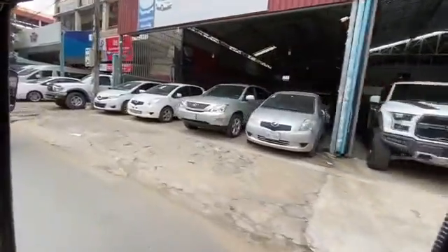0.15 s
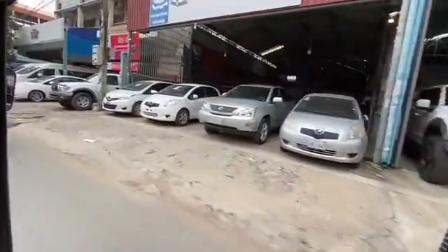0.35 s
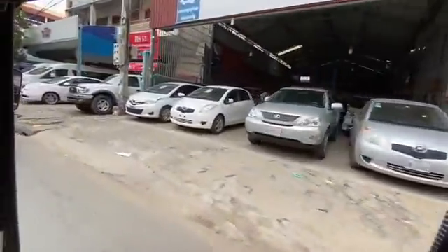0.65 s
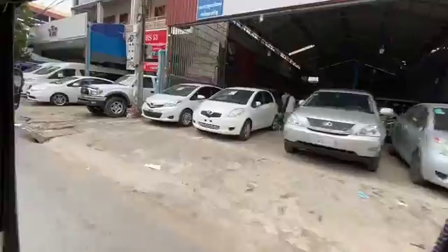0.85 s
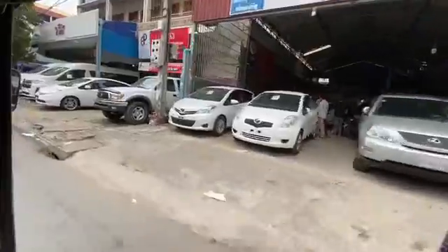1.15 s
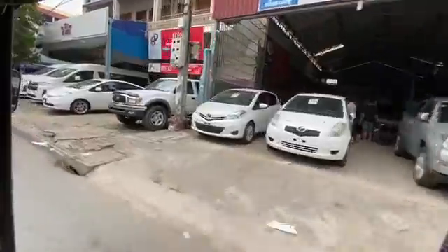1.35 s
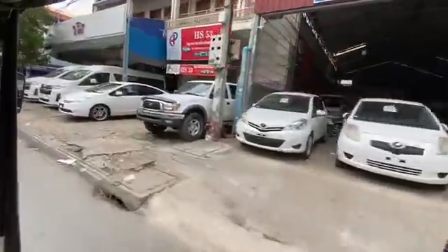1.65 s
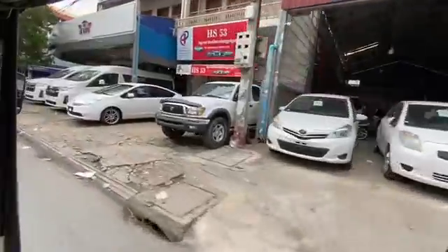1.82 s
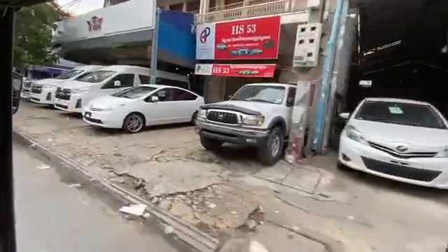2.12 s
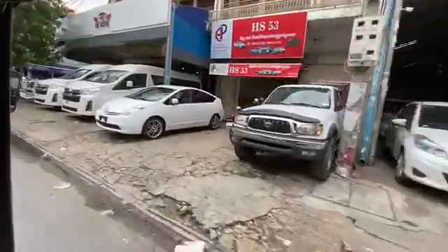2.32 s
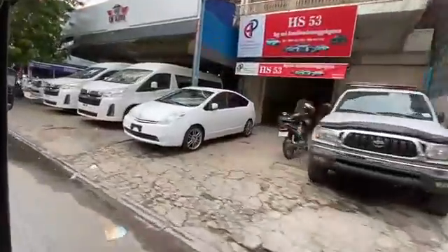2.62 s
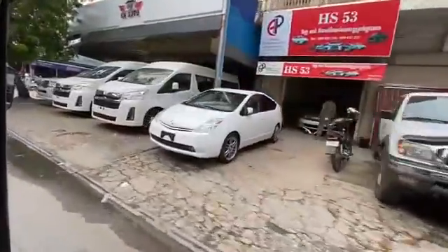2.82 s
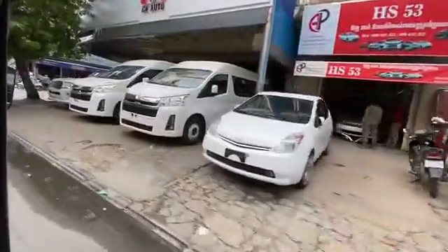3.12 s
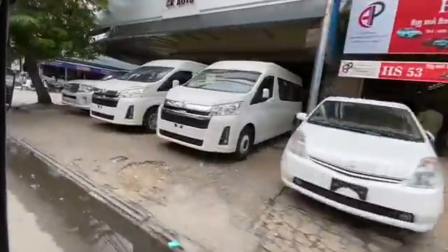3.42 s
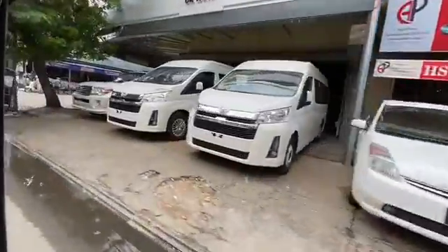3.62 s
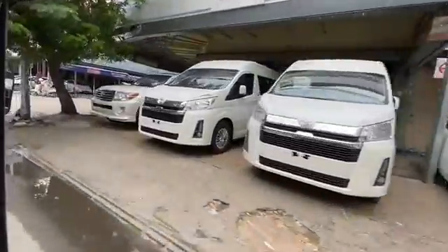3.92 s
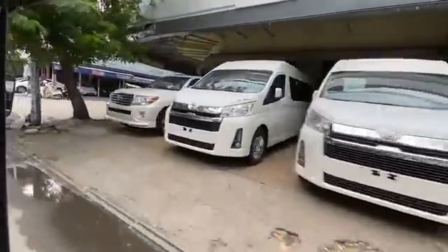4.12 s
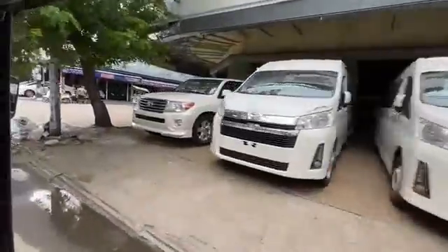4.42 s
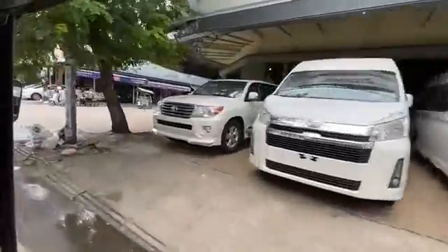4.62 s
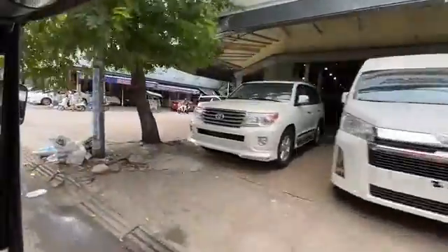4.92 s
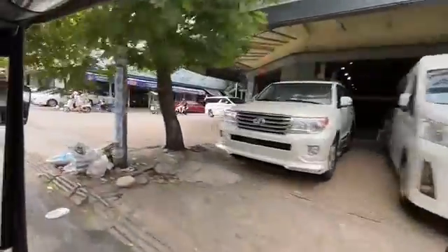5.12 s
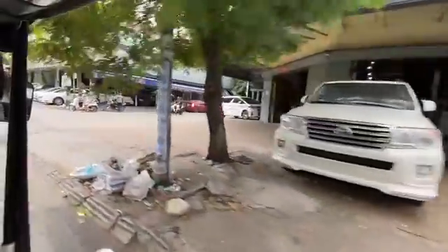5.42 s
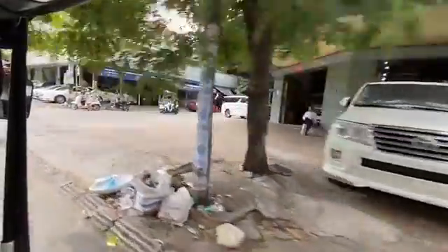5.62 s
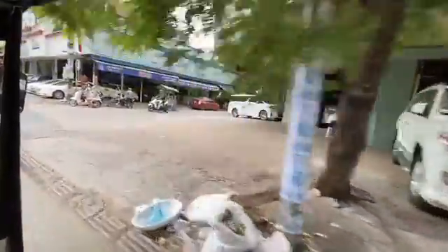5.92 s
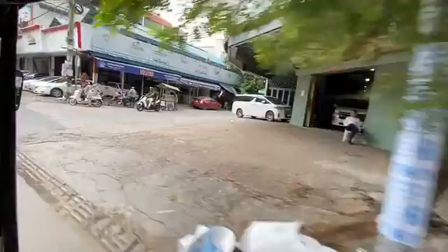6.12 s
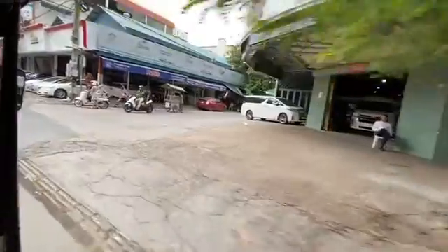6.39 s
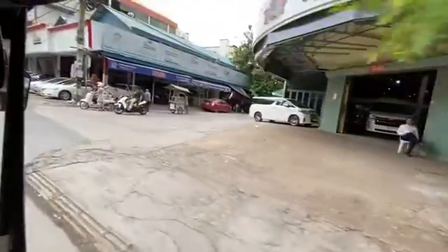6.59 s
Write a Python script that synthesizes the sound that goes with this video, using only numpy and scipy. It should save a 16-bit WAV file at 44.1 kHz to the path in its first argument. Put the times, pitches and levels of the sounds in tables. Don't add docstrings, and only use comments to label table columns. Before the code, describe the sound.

Low engine putter, wind thumps, road hiss and tiny metallic rattles inside an open three-wheeled taxi; revs sag, then briefly recover and fall.

```python
import sys
import numpy as np
from scipy import signal
from scipy.fft import rfft, irfft, next_fast_len
from scipy.io import wavfile
from scipy.ndimage import uniform_filter1d

SR = 44100
rng = np.random.default_rng(int(sys.argv[2]) if len(sys.argv) > 2 else 0)


def convert_level_to_amplitude(level_db):
    exponent = np.asarray(level_db, float) / 20
    return 10 ** exponent


def materialize(psi):
    bounded = np.clip(np.atleast_2d(psi).T, -1, 1)
    quanta = np.round(bounded * 32767).astype(np.int16)
    wavfile.write(sys.argv[1], SR, quanta)


N = 297673
TIME_S = np.arange(N) / SR
PORT_LAG_S = .00046
GEAR_TEETH = 96

# t/s, firing rate f/Hz
FIRING = [(0, 24.7), (.5, 24.62), (1.2, 26.4), (1.5, 26.65), (2.3, 27.1), (3.0, 19.5), (3.25, 18.8),
          (3.5, 18.5), (3.85, 18.7), (4.5, 18.8), (4.75, 19.0), (5.0, 20.5), (5.25, 21.45), (5.5, 21.6),
          (5.8, 21.0), (6.25, 19.2), (6.5, 17.4), (6.75, 16.5)]
# t/s, level/dB
LOAD = [(0, -24), (.7, -24.5), (1.3, -25), (1.6, -29.5), (2.0, -32), (2.3, -40), (2.55, -41.5),
        (2.75, -50.5), (3.0, -44), (3.8, -41), (4.05, -32), (4.75, -29), (5.0, -30), (5.5, -26.5),
        (5.8, -29.5), (6.2, -29), (6.75, -29)]
# t/s, level/dB
WIND = [(0, -16), (.9, -11.5), (1.63, -9.5), (1.74, -17), (1.9, -14.5), (2.06, -12.5), (2.12, -29),
        (2.6, -22), (2.72, -23), (2.84, -17), (3.12, -12), (3.35, -22), (3.78, -18.5), (3.87, -9.5),
        (4.6, -10.5), (5.05, -9), (5.9, -11), (6.1, -8)]


def at_hz(points, hz):
    table_hz, table_db = np.transpose(points)
    return np.interp(np.log(hz), np.log(table_hz), table_db)


def in_time(rows):
    s, *columns = np.transpose(rows)
    return [np.interp(TIME_S, s, column) for column in columns]


def rms_one(x):
    return x / np.sqrt(np.mean(x ** 2) + 1e-20)


def drift(rate_hz):
    r = np.exp(-80 * np.pi * rate_hz / SR)
    slow = signal.lfilter([1], [1, -2 * r, r * r], rng.standard_normal(N // 40 + 2002))
    slow = rms_one(slow[2000:])
    return np.interp(np.arange(N) / 40, np.arange(len(slow)), slow)


def late(x, lag_s):
    return np.roll(x, round(lag_s * SR))


def swell(x, centre, width):
    return np.exp(-(2 * (x - centre) / width) ** 2)


def phase(hz):
    return 2 * np.pi * np.cumsum(hz) / SR


def firing_hz():
    return in_time(FIRING)[0]


def load_db():
    return in_time(LOAD)[0] + 29


def wavering(turn, width_hz, lag_s, steady=0):
    tone = (steady + drift(width_hz)) * np.sin(turn) + drift(width_hz) * np.cos(turn)
    tone = tone / np.sqrt(1 + steady ** 2 / 2)
    return np.array([tone, late(tone, lag_s)])


def turbulence(spectrum, likeness, lag_s, patchy_db, flicker_hz, right_db):
    low_hz, high_hz = spectrum[0][0], spectrum[-1][0]
    centres = low_hz * 2 ** np.arange(0, np.log2(high_hz / low_hz) + .3, 1 / 3)
    size = next_fast_len(N)
    hz = np.fft.rfftfreq(size, 1 / SR)
    shape = convert_level_to_amplitude(at_hz(spectrum, hz + 1)) * (hz > low_hz) * (hz < high_hz)
    white = rfft(rng.standard_normal((3, size))) * shape
    together, out = drift(flicker_hz / 2), 0
    for centre in centres:
        alike = np.clip(at_hz(likeness, centre), 0, 1)
        share = np.cos(np.pi / 2 * np.clip(3 * np.log2((hz + 1) / centre), -1, 1)) ** 2
        common, left, right = irfft(white * share)[:, :N]
        pair = np.sqrt(alike) * np.array([common, late(common, lag_s)])
        pair += np.sqrt(1 - alike) * np.array([left, right])
        patch = 0.33 * together + drift(flicker_hz)
        patch = patch - uniform_filter1d(patch, size=SR // 3)
        balance_db = at_hz(right_db, centre) * np.array([[-.5], [.5]])
        out = out + pair * convert_level_to_amplitude(patchy_db * patch + balance_db)
    return rms_one(out)


def reflections():
    reflectors = [(1.04, 0.38, 2), (1.098, 1, 3.5), (1.904, 0.19, -4), (2.257, 0.097, 2.5),
                  (3.824, 0.97, 4.0), (4.06, 0.21, 2.5), (5.45, 0.93, 2.0)]
    return sum(db * swell(TIME_S, s, length) for s, length, db in reflectors)


def opposite_hiss():
    # f/Hz, level/dB per Hz
    opposite_spectrum = [(11300, -10), (11800, -2), (12900, 3), (13200, -40), (14700, -40), (14900, -4),
                         (15800, -3)]
    hiss = turbulence(opposite_spectrum, [(12000, 1)], 0, patchy_db=-0.5, flicker_hz=15, right_db=[(12000, 0)])[0]
    return convert_level_to_amplitude(-60.5 + reflections()) * hiss * [[1], [-1]]


def alike_above(pair, hz):
    mid, side = (pair[0] + pair[1]) / 2, (pair[0] - pair[1]) / 2
    side = signal.sosfiltfilt(signal.cheby2(8, 30, hz, fs=SR, output="sos"), side)
    return np.array([mid + side, mid - side])


def tyre_hiss():
    # f/Hz, level/dB per Hz
    hiss_spectrum = [(2000, -6), (2900, -6.5), (5500, -5.5), (6500, -9), (7200, -14), (10300, -15.5),
                     (11300, -20), (11700, -26.5), (11800, -90), (12750, -88), (12850, -19), (13300, -20),
                     (14900, -18.5), (15200, -53)]
    puff_db = .7 * np.cos(phase(firing_hz()))
    hiss = turbulence(hiss_spectrum, [(3000, 0.034), (9000, 0.04), (14000, 0.058)], PORT_LAG_S,
                      patchy_db=0.9, flicker_hz=30.5,
                      right_db=[(2500, 9.5), (4500, -5.0), (6500, -5.0), (8000, 0.5), (14000, 4.5)])
    return alike_above(convert_level_to_amplitude(-41.5 + reflections() + puff_db) * hiss, 12800)


def road():
    # f/Hz, level/dB per Hz
    road_spectrum = [(250, -54), (450, -9.5), (650, -11), (900, -7.5), (1300, -9.5), (2000, -15),
                     (2450, -17.5), (2650, -17.5), (2900, -20), (4500, -27.5)]
    roar = turbulence(road_spectrum, [(500, 0.25), (2000, 0.031)], PORT_LAG_S,
                      patchy_db=1.5, flicker_hz=17.5, right_db=[(600, -1.5), (2000, -2.4)])
    return convert_level_to_amplitude(-30 + 0.46 * reflections()) * roar


def flutter():
    # f/Hz, level/dB per Hz
    flutter_spectrum = [(110, 1.5), (170, 5.5), (250, -0.5), (400, -2), (600, -7.5), (1000, -10)]
    builds_s = 0.18
    wind_db = uniform_filter1d(in_time(WIND)[0] + 14.5, size=SR // 4)
    level_db = -22.5 + 0.38 * wind_db + 0.33 * (firing_hz() - 24) + 0.34 * load_db()
    level_db = np.minimum(level_db, late(level_db, builds_s))
    flaps = turbulence(flutter_spectrum, [(170, 0.47), (500, 0.041)], 0,
                       patchy_db=1.7, flicker_hz=13.0, right_db=[(170, 0.2), (500, 0.29)])
    return convert_level_to_amplitude(level_db) * flaps


def buffeting():
    # f/Hz, level/dB per Hz
    buffet_spectrum = [(22, -6), (45, 2.5), (70, 11.5), (100, 9.5), (140, 5.5), (200, -17), (300, -13)]
    lump_db = 0.5 * drift(8.2)
    chug_db = 2.5 * np.cos(phase(firing_hz()))
    air = turbulence(buffet_spectrum, [(40, 0.8), (90, 0.95), (180, 0.77)], 0,
                     patchy_db=1.3, flicker_hz=8.0, right_db=[(40, 0.92), (150, 5.2)])
    return convert_level_to_amplitude(in_time(WIND)[0] + lump_db + chug_db - 7.5) * air


def snaps(table):
    cycles, lift_db, reach_s = 1.25, 3.5, .012
    out, signs = np.zeros(N), rng.choice([-1, 1], len(table))
    for (s, level_db, hz), sign in zip(table, signs):
        span = slice(round((s - reach_s) * SR), round((s + reach_s) * SR))
        t = np.arange(span.start, span.stop) / SR - s
        flick = swell(t, 0, cycles / hz) * np.cos(2 * np.pi * hz * t + 1.0)
        out[span] += sign * convert_level_to_amplitude(level_db + lift_db) * flick
    return out


def gusts():
    # t/s, level/dB, centre f/Hz
    gust_table = [(0.379, -16, 414), (0.527, -20, 383), (0.855, -23, 600), (1.579, -11.5, 325),
                  (1.616, -13, 136), (1.71, -10.5, 212), (1.738, -11, 636), (1.76, -8, 435),
                  (1.782, -18, 637), (1.796, -10, 790), (1.834, -7, 885), (1.852, -10, 550),
                  (1.873, -22.5, 885), (1.923, -15.5, 255), (2.069, -15.5, 314), (2.176, -18.5, 557),
                  (2.223, -15.5, 720), (2.255, -15.5, 607), (2.307, -14, 910), (2.342, -22, 450),
                  (2.365, -35, 700), (2.472, -27, 272), (2.582, -21.5, 690), (2.617, -23, 610),
                  (2.634, -22, 704), (2.666, -20.5, 450), (3.13, -21, 270), (3.146, -15, 600),
                  (3.161, -18, 890), (3.176, -22, 716), (3.188, -9.5, 880), (3.205, -22, 550),
                  (3.219, -21, 362), (3.532, -16.5, 255)]
    # t/s, peak level/dB, f/Hz
    vortex_table = [(.8522, -13, 710), (1.7215, -4, 400), (1.7255, -5, 500), (1.7323, -2, 600),
                    (1.7343, 0, 620), (1.7365, 0, 650), (1.7385, 0, 680), (1.7436, -17, 800),
                    (1.751, -13, 720), (1.7545, -4, 710), (1.7578, -22, 670), (1.7634, -8, 700),
                    (1.767, -15, 710), (1.7725, -7, 885), (1.7758, -8, 680), (1.7795, -7, 850),
                    (1.785, 1, 820), (1.7905, -1, 1310), (1.7943, -9, 1000), (1.7996, -9, 870),
                    (1.8071, -13, 760), (1.8249, -9, 690), (1.8289, -2, 760), (1.8324, -7, 750),
                    (1.8355, -14, 900), (1.839, -6, 1300), (1.8443, -12, 880), (1.8512, -10, 775),
                    (1.8585, -9, 600), (1.8724, -10, 1090), (2.172, -17, 600), (2.22, -24, 900),
                    (2.227, -2.5, 825), (2.2546, -13, 1030), (2.3075, -24, 1010), (2.3124, -3.5, 1020),
                    (2.3157, -8.5, 170), (2.579, -18, 950), (2.5825, -16, 700), (2.586, -17, 450),
                    (2.3315, -16, 800), (2.367, -22, 900), (2.642, -8.5, 1030), (3.147, -14, 1040),
                    (3.152, -17, 920), (3.1567, -10, 1250), (3.1605, -1, 1100), (3.168, -9, 1050),
                    (3.1732, -7, 810), (3.1767, -2, 740), (3.1817, -15, 1020), (3.1858, -9, 950),
                    (3.1894, -6, 980), (3.1933, -3.5, 930), (3.2247, -13, 920)]
    fall = 0.81
    left = np.zeros(N)
    noise = rng.standard_normal(N) * convert_level_to_amplitude(4 * drift(250))
    for s, level_db, hz in gust_table:
        length = 0.038 * (hz / 500) ** -0.88
        span = slice(round((s - 2 * length) * SR), round((s + 2 * length) * SR))
        low_cut = signal.butter(1, hz * .5, "high", fs=SR, output="sos")
        high_cut = signal.butter(3, hz * 1.26, "low", fs=SR, output="sos")
        burst = rms_one(signal.sosfilt(np.vstack([low_cut, high_cut]), noise[span]))
        width = length * np.where(TIME_S[span] > s, fall, 2 - fall)
        left[span] += convert_level_to_amplitude(level_db) * burst * swell(TIME_S[span], s, width)
    left += snaps(vortex_table)
    leak = signal.sosfilt(signal.butter(1, 1200, "low", fs=SR, output="sos"), left)
    return np.array([left, -convert_level_to_amplitude(-10) * leak])


def rattles():
    # t/s, length/s, level/dB
    rattle_table = [(.02, .1, -54), (0.572, 0.08, -46), (1.09, 0.32, -49), (1.42, .12, -52),
                    (1.5, .04, -51), (1.64, 0.06, -47), (1.68, .03, -49), (1.825, .05, -50),
                    (1.91, .02, -49), (1.94, .025, -47), (1.98, .04, -48), (2.13, .04, -52),
                    (2.165, .04, -51), (2.21, .05, -50), (2.27, .05, -52), (2.36, .2, -52), (2.5, .12, -52),
                    (2.61, .04, -50), (2.65, 0.023, -46)]
    ring = signal.butter(2, [5950, 6500], "band", fs=SR, output="sos")
    jingle = rms_one(signal.sosfilt(ring, rng.standard_normal(N) * convert_level_to_amplitude(2.5 * drift(39))))
    return jingle * sum(convert_level_to_amplitude(db) * swell(TIME_S, s, length) for s, length, db in rattle_table)


def ticks():
    # t/s, peak level/dB
    tick_table = [(.2, -43), (.518, -54), (4.515, -52), (5.332, -53), (5.9495, -44)]
    panel_hz = (11750, 13900, 14700)
    brush_s = .006
    brush = sum(convert_level_to_amplitude(db) * swell(TIME_S, s, brush_s) for s, db in tick_table)
    return sum(brush * np.sin(2 * np.pi * hz * TIME_S) * 11750 ** 2 / hz ** 2 for hz in panel_hz)


def squeaks():
    # t/s, length/s, start f/Hz, end f/Hz, level/dB
    squeak_table = [(5.394, .043, 9650, 10350, -42), (6.58, .22, 6500, 6540, -43),
                    (2.122, .022, 6000, 6150, -47), (2.148, .03, 6150, 6400, -45),
                    (2.19, .025, 6250, 6000, -45), (2.235, .025, 5950, 6200, -48),
                    (2.262, .03, 6300, 6420, -46), (2.338, .025, 6150, 6420, -47),
                    (2.375, .025, 6000, 6100, -49), (2.405, .05, 6250, 6400, -49),
                    (2.455, .02, 6150, 6050, -48), (2.492, .016, 6050, 6100, -48),
                    (2.6, .025, 6300, 6150, -47), (2.642, .018, 6100, 6300, -45),
                    (1.625, .035, 6100, 6250, -49), (1.93, .025, 6100, 6150, -49),
                    (1.965, .035, 6200, 6150, -49), (.56, .03, 6100, 6300, -48),
                    (.98, .03, 6200, 6350, -50), (1.16, .03, 6100, 6250, -50), (1.42, .03, 6150, 6300, -50)]
    stick_slip = np.sin(np.pi * 22 * TIME_S) ** 2
    out = np.zeros(N)
    for s, length, start_hz, end_hz, level_db in squeak_table:
        u = np.clip((TIME_S - s) / length, 0, 1)
        turn = phase(start_hz + (end_hz - start_hz) * u)
        grip = 1 - length * 3.8 * (1 - stick_slip)
        out += convert_level_to_amplitude(level_db) * np.sqrt(np.abs(np.sin(np.pi * u))) * grip * np.sin(turn)
    return out * convert_level_to_amplitude([[-1.0], [1.0]])


def small_metal():
    out = rattles() + ticks()
    return np.array([out, late(out, PORT_LAG_S)]) + squeaks()


def frame_knocks():
    # t/s, peak level/dB, f/Hz
    knocks = [(.397, -20, 450), (.521, -19, 450), (1.5805, -14, 402), (1.5835, -17, 377), (6.026, -19, 250)]
    return snaps(knocks)


def panels():
    # t/s, length/s, f/Hz, width f/Hz, level/dB
    rings = [(0.81, 0.28, 2590, 100, -42.5), (1.64, 0.3, 2620, 55, -46), (2.29, 0.27, 2400, 110, -40),
             (3.75, 0.44, 2830, 90, -46), (4.05, 0.36, 2544, 180, -37.5), (4.04, 0.72, 1790, 45, -39),
             (4.795, 0.16, 1760, 25, -40), (4.953, 0.26, 1483, 42, -34.5), (5.4, 0.32, 2700, 27, -43.5),
             (6.087, 0.45, 1840, 57, -42), (3.8, 0.049, 960, 13, -21), (3.857, 0.027, 910, 15, -34),
             (2.6, .16, 2300, 30, -46), (2.85, 0.22, 1950, 25, -44), (6.47, .2, 1880, 13, -40.5),
             (6.65, .25, 2620, 13, -45)]
    # t/s, length/s, f/Hz, width f/Hz, level/dB
    booms = [(4.5, 0.47, 88, 3.8, -24), (4.954, 0.48, 92, 2, -21), (5.52, 0.42, 95, 1.4, -17),
             (6.1, 0.25, 113, 2.7, -27), (6.75, 0.65, 91, 1.5, -32), (6.0, 0.62, 133, 3.6, -22.5),
             (6.5, .55, 112, 1.8, -22), (5.9, 0.44, 280, 5, -31), (5.95, 0.35, 220, 5.3, -32.5),
             (0.1, .3, 76, 3.8, -19.5)]
    out = np.zeros((2, N))
    for s, length, hz, width_hz, db in [*rings, *booms]:
        steady = 2 if hz < 1000 else 0
        ring = wavering(2 * np.pi * hz * TIME_S, width_hz, PORT_LAG_S, steady=steady)
        out += convert_level_to_amplitude(db) * swell(TIME_S, s, length) * ring
    return out


def chain():
    # t/s, mesh pitch f/Hz, mesh level/dB
    mesh_table = [(0, 880, -46), (2.3, 890, -47), (2.75, 880, -46), (3.43, 875, -43), (3.52, 895, -39),
                  (3.59, 866, -37), (3.65, 875, -54), (4.0, 875, -52), (4.07, 898, -40), (4.42, 870, -42),
                  (4.6, 872, -38), (4.87, 905, -38), (5.0, 872, -43), (5.2, 863, -41), (6.03, 890, -42),
                  (6.12, 882, -38), (6.4, 872, -45), (6.48, 870, -54)]
    mesh_hz, mesh_db = in_time(mesh_table)
    guard_db = -53.5 + 0.57 * reflections()
    mesh = wavering(phase(mesh_hz), 22, PORT_LAG_S / 2, steady=1.5)
    guard = wavering(2 * np.pi * 2526 * TIME_S, 110, PORT_LAG_S)
    return convert_level_to_amplitude(mesh_db + 7) * mesh + convert_level_to_amplitude(guard_db) * guard


def casing():
    # f/Hz, width f/Hz, level/dB
    modes = [(983, 24, -51), (1294, 25, -41), (1500, 20, -47.5), (1742, 20, -55.5), (2120, 26, -55),
             (2500, 22, -59)]
    throb_db = 2 * np.cos(phase(firing_hz())) + load_db()
    out = np.zeros((2, N))
    for hz, width_hz, db in modes:
        mode = wavering(2 * np.pi * hz * TIME_S, width_hz, PORT_LAG_S)
        out += convert_level_to_amplitude(db + throb_db + 2.6 * drift(3.6)) * mode
    return out


def gears():
    gear_hz = GEAR_TEETH * firing_hz()
    whine_db = -48.5 - 0.073 * load_db() + 4.5 * swell(gear_hz, 1860, 176)
    whine_db += -10 * swell(TIME_S, 2.45, .12)
    idler = wavering(phase(gear_hz / 2), 19, PORT_LAG_S / 2)
    idler_gain = convert_level_to_amplitude(-45) * swell(gear_hz / 2, 1060, 160)
    return idler_gain * idler + convert_level_to_amplitude(whine_db) * wavering(phase(gear_hz), 40, PORT_LAG_S)


def engine():
    # f/Hz, level/dB
    exhaust_colour = [(50, -9), (66, 1), (78, 1), (87, 10), (101, 9), (113, -3), (160, -4), (182, -8),
                      (197, 1), (213, 4), (226, -3), (238, 2), (250, -1), (265, -18), (310, -22), (347, -5),
                      (375, -22), (750, -36)]
    gear_feet_hz = (24.7, 19.8)
    shift_s, silencer_hz = 2.7, 150
    rate_hz, load = firing_hz(), load_db()
    turn, low_gear = phase(rate_hz), TIME_S < shift_s
    bark_db = -3.5 + 1.5 * (rate_hz - np.where(low_gear, *gear_feet_hz)) + 0.12 * load
    shake_db = -31 + .6 * load + 5 * swell(2 * rate_hz, 37.5, 8)
    out = convert_level_to_amplitude(shake_db) * np.sin(2 * turn) * np.ones((2, 1))
    for k in range(3, 30):
        colour_db = np.interp(k * rate_hz, *np.transpose(exhaust_colour))
        colour_db += bark_db * np.clip(k * rate_hz / silencer_hz * 4 - 3.5, 0, 1)
        if k >= 8 and k % 2 == 0:
            colour_db += -10 * ~low_gear
        burn_db = 1.2 * drift(2.5)
        start = .7 * rng.standard_normal() - .5 * k * np.log(k)
        spread = np.array([[0], [.55 * rng.standard_normal()]])
        harmonic = np.sin(k * turn + start + spread) * convert_level_to_amplitude([[-2.5], [1.5]])
        out += convert_level_to_amplitude(load - 29 + colour_db + burn_db) * harmonic
    return np.sqrt(2) * out


def scene():
    street = opposite_hiss() + tyre_hiss() + road()
    air = flutter() + buffeting() + gusts()
    body = small_metal() + frame_knocks() + panels()
    drive = chain() + casing() + gears() + engine()
    return street + air + body + drive


def low_pass(x):
    return signal.sosfilt(signal.butter(12, 15910, fs=SR, output="sos"), x)


def record(dry):
    mix = np.tanh(dry / 1.167)
    return low_pass(mix)


dry = scene()
out = record(dry)
materialize(out)
```